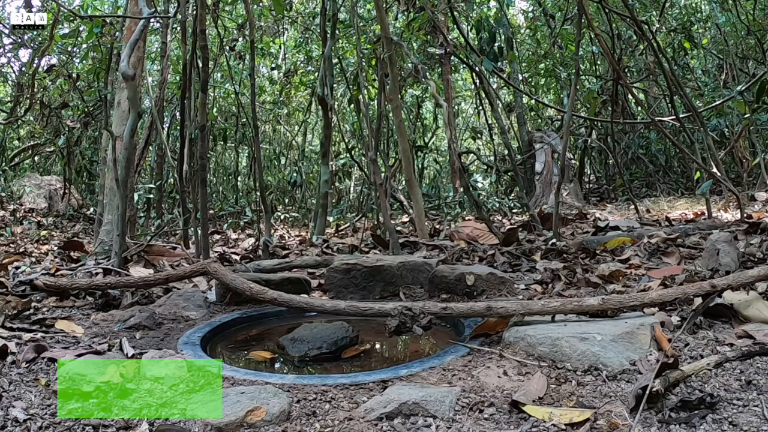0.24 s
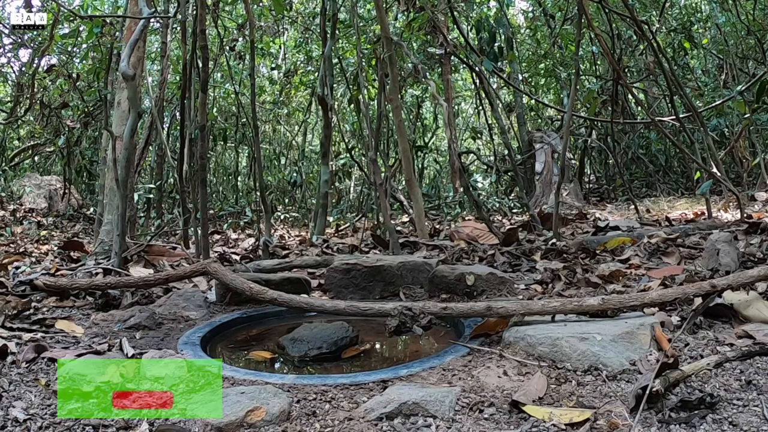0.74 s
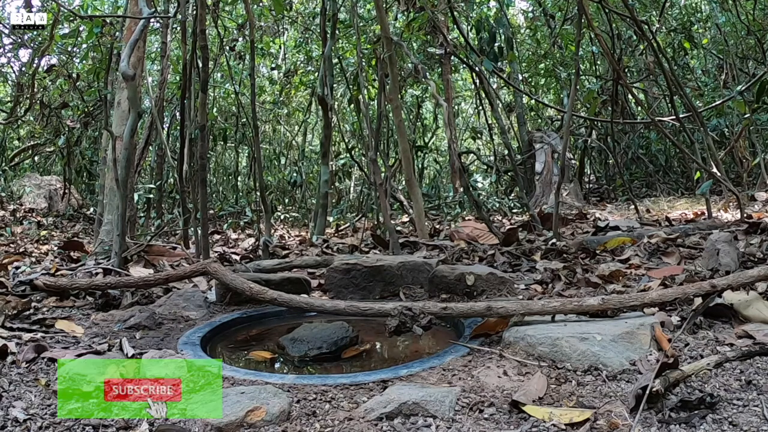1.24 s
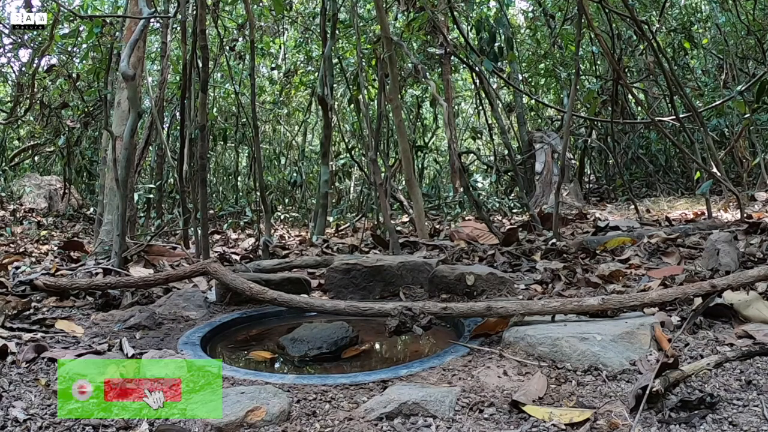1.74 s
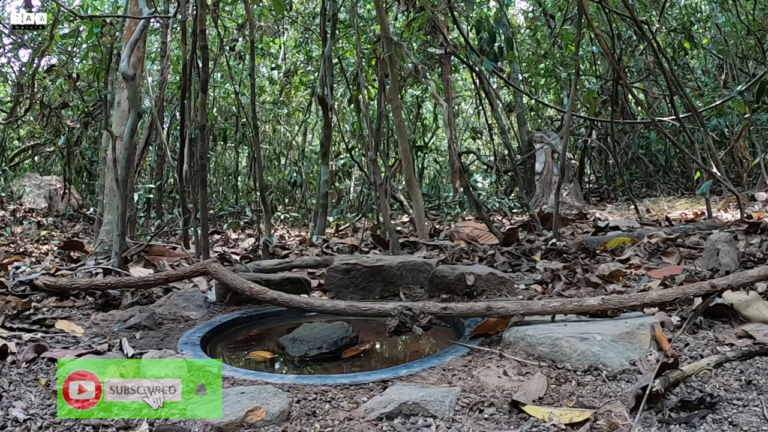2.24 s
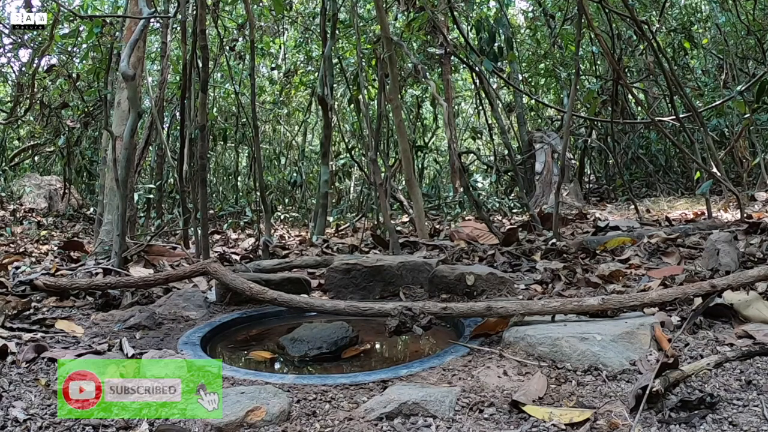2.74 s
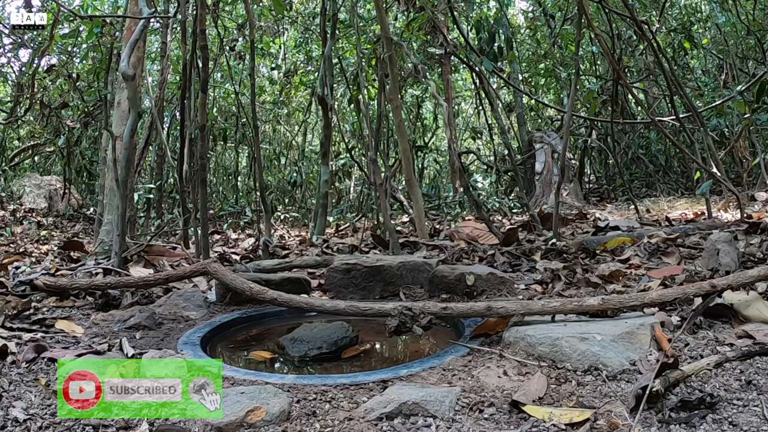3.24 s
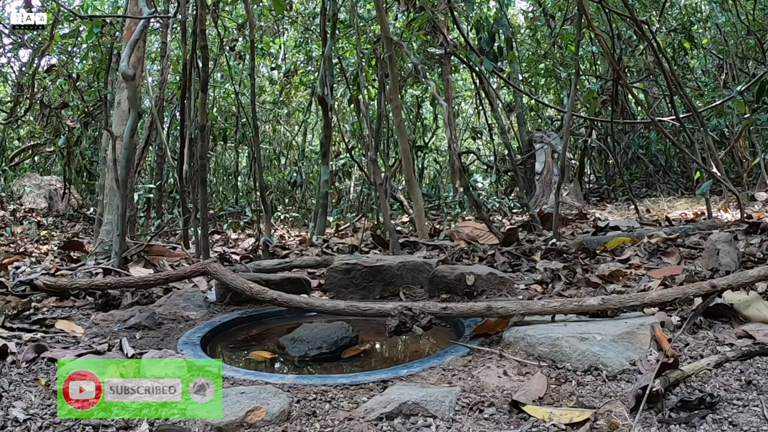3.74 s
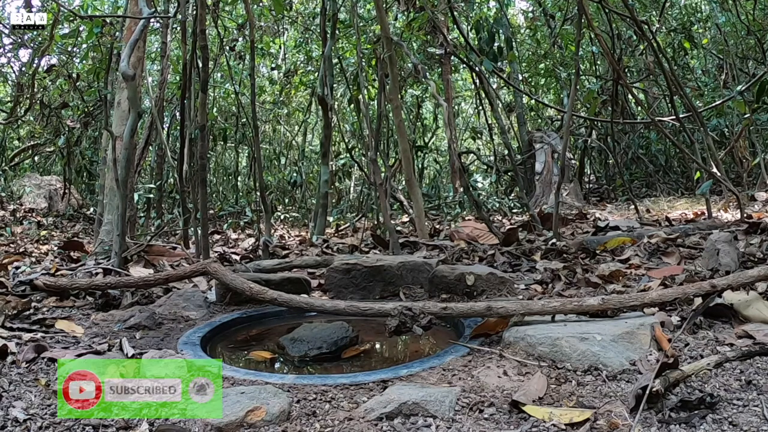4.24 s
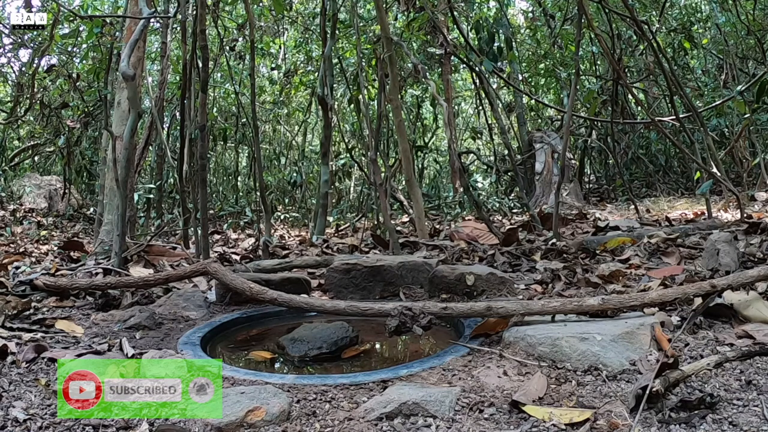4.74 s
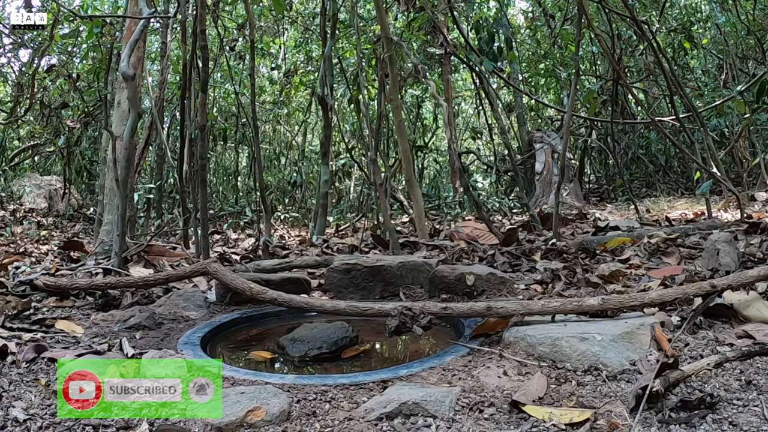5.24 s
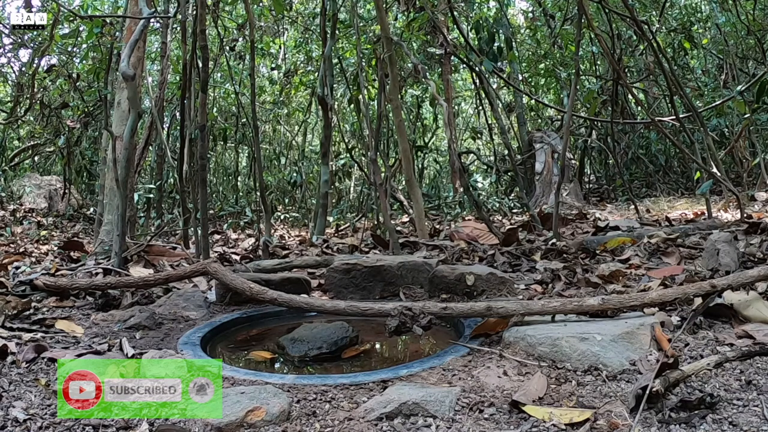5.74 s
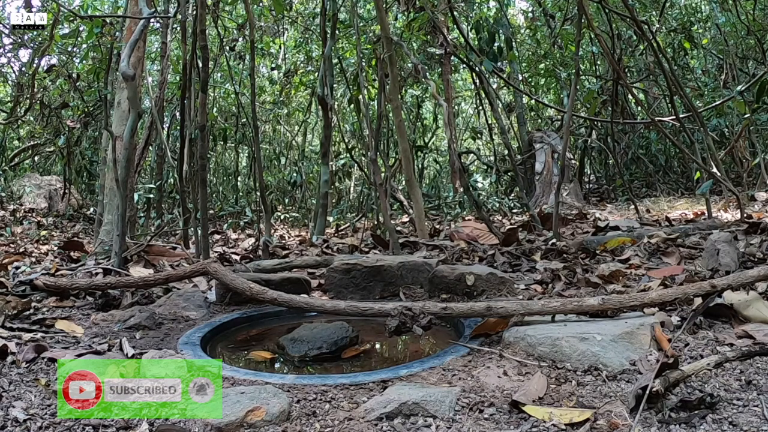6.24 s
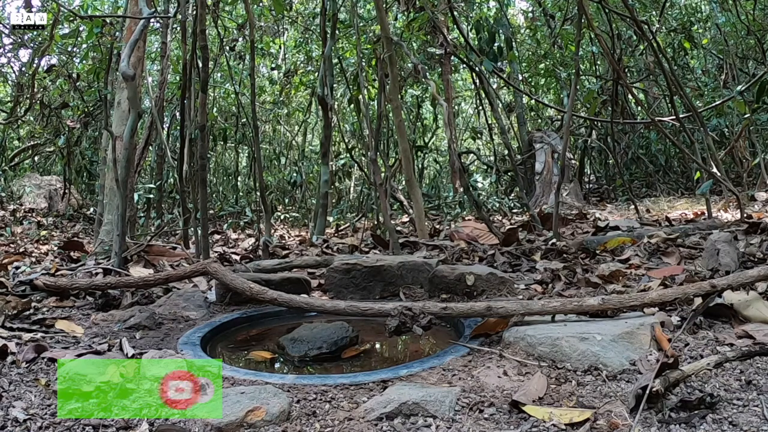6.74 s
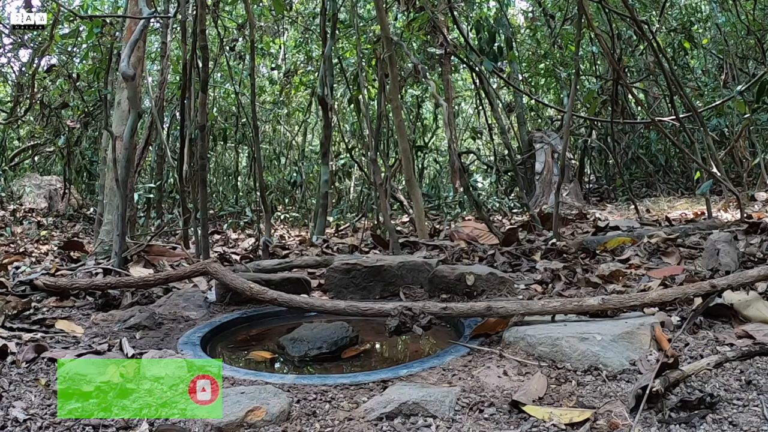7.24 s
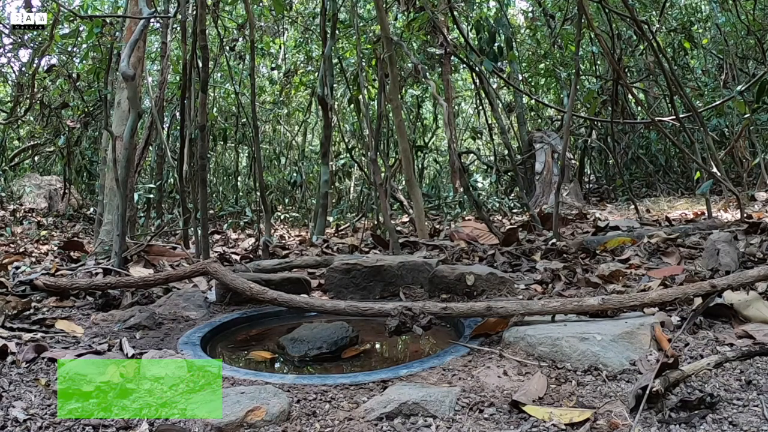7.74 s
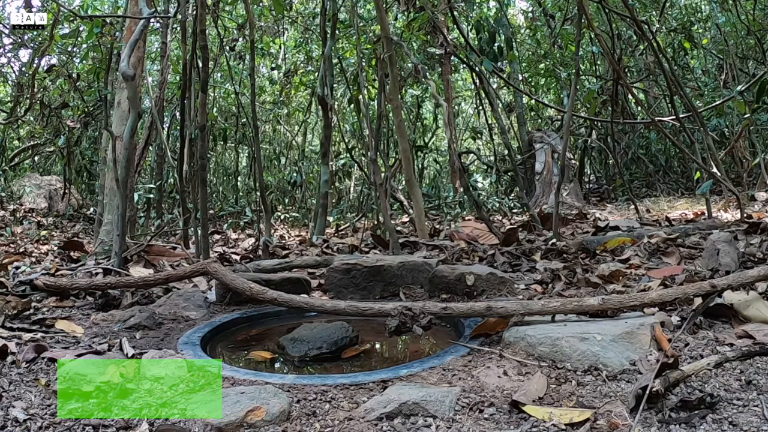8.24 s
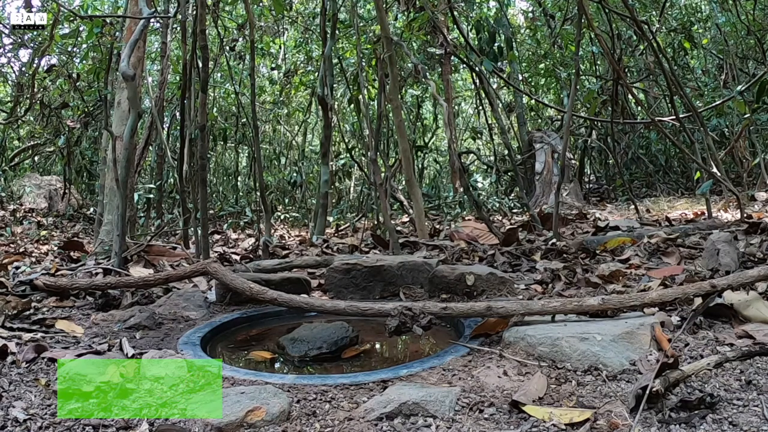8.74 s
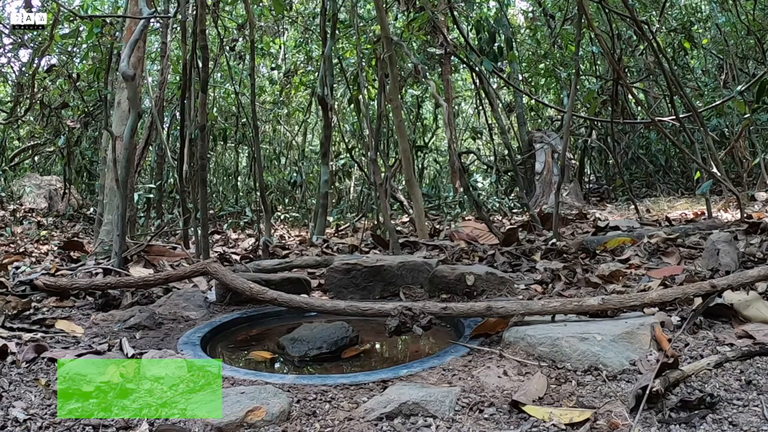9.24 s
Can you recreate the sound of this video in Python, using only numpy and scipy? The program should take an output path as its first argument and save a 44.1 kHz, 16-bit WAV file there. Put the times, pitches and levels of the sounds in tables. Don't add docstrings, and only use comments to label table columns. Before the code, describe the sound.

Stereo microphones at a small forest pool. A near bird on the left repeats a hoarse chatter snapping into a bright rising flick, loudest first and fading after a few calls. A farther hooter gives three separate low three-note phrases. Thin whistles and cries answer with woody echo; wings flutter past on the right, a squawk sounds near seven seconds, and a trill follows at eight. Leaves rustle, insects hiss softly.

```python
import sys
import numpy as np
from scipy import signal
from scipy.fft import rfft, irfft
from scipy.io import wavfile
from scipy.ndimage import uniform_filter1d

SR = 44100
rng = np.random.default_rng(int(sys.argv[2]) if len(sys.argv) > 2 else 0)


def boost_factor(decibels):
    exponent = np.asarray(decibels, float) / 20
    return 10 ** exponent


def pcm_store(signal):
    levels = np.round(np.clip(np.atleast_2d(signal), -1, 1) * 32767)
    wavfile.write(sys.argv[1], SR, levels.astype(np.int16).T)


N = 418950

# start_s, flick_start_s, chatter_pitch_hz, flick_top_hz, flick_level_db, chatter_level_db
FLICK_CALLS = [
    (1.018, 1.0825, 802, 5110, -20.5, -1),
    (1.232, 1.296, 771.5, 4695, -23.5, -1),
    (1.534, 1.592, 748, 4300, -24, -2.5),
    (1.726, 1.783, 751, 4200, -27.5, -4),
    (1.957, 2.013, 746, 4225, -26.5, -3),
    (2.552, 2.608, 764, 4000, -33.5, -3),
    (3.251, 3.299, 755, 4450, -38, -2),
]
CHATTER_DB, CHATTER_FOLLOWS = -34.5, 0.32
PERCH_PAN_DB, HOPS_DB_PER_S = 4, -2
FLICK_S, FLICK_RISE_S, FLUTTER_HZ, FLUTTER = .029, 0.00896, 114.5, 0.41
FLICK_FROM, LEAPS_PER_DB = 4.3, .24
BREAK_DB, OCTAVE_DB = -18, -44
BRIGHTENS = 1.27

# start_s, pitch_factor, level_db, swell_factor
HOOT_PHRASES = [
    (1.675, 1.002, -37, 0.82),
    (5.175, 1, -36.5, 1.12),
    (8.415, 1.002, -37, 0.83),
]
# delay_s, pitch_hz, level_db (at full swell)
HOOT_SHAPES = [
    [(-.05, 775, -24), (-.028, 890, -9), (-.011, 778, -8), (.012, 899, -4), (.06, 793, 1.7),
     (.098, 818, -5)],
    [(.19, 794, -12.5), (.235, 726, 0), (.27, 760, -3), (.296, 800, -12)],
    [(.352, 762, -13), (.395, 709.3, -3), (.445, 797, 0), (.486, 814, -9)],
]

# start_s, length_s, first_hz, last_hz, level_db, bend_name
CLEAR_WHISTLES = [(1.8, 0.047, 1500, 750, -52, "hook"), (1.67, 0.119, 1090, 1030, -43.5, "glide"),
                  (3.985, 0.027, 920, 920, -48.5, "arch"), (8.08, 0.033, 1200, 1100, -55.5, "glide"),
                  (8.22, 0.17, 1040, 990, -48.5, "arch"), (6.282, 0.0126, 2600, 5100, -37, "glide"),
                  (6.332, .025, 3000, 5600, -40, "glide"), (6.335, 0.028, 1650, 3100, -48.5, "dip"),
                  (6.357, 0.042, 3200, 2200, -33.5, "loop"), (6.39, 0.01, 8000, 4300, -39, "glide"),
                  (7.49, 0.094, 6900, 6300, -52.5, "glide"), (3.99, 0.051, 1920, 1920, -56.5, "arch")]
# start_s, length_s, first_hz, last_hz, level_db, bend_name
SOFT_WHISTLES = [(9.08, 0.049, 1950, 1250, -57, "glide"), (3, 0.17, 1600, 1710, -66, "arch"),
                 (.64, 0.11, 2080, 1880, -47, "dip"), (.76, 0.122, 1940, 2070, -50, "glide"),
                 (2.79, 0.24, 1930, 1830, -57.5, "glide"), (3.52, 0.086, 2540, 2420, -46.5, "glide"),
                 (6.67, 0.25, 2160, 1960, -58, "glide"), (.552, 0.036, 2750, 3280, -50, "hook"),
                 (.585, 0.07, 3150, 2480, -53, "hook"), (.655, .12, 2480, 2440, -60, "glide"),
                 (.05, 0.045, 1130, 1330, -55, "glide"), (.105, .03, 1350, 1020, -54, "hook"),
                 (.16, .03, 1350, 1020, -59, "hook"), (2.22, 0.25, 1950, 2000, -51, "dip"),
                 (2.35, 0.21, 2900, 2950, -59, "glide"), (8.78, .2, 1520, 1450, -63, "glide"),
                 (4.37, 0.081, 1400, 1270, -53, "glide")]
WHISTLE_BENDS = {"glide": (.52, .001), "hook": (.76, 0.0023), "arch": (.55, .075), "dip": (.48, -.09),
                 "loop": (.49, 1.2)}

# start_s, length_s, first_hz, last_hz, note_rate_per_s
TRILL_LINES = [
    (6.0, .255, 3700, 3050, 41),
    (8.024, .71, 2600, 2310, 59.6),
    (8.04, .3, 3080, 3050, 59.6),
    (8.024, .71, 3720, 2980, 59.6),
]
# first_level_db, last_level_db, left_minus_right_db, roughness (0-1)
TRILL_LEVELS = [
    (-39, -34.5, 8, .24),
    (-43.5, -43, -6, .3),
    (-57, -54, -3.5, .4),
    (-47, -44, -3, .3),
]
SINKS_BY, NOTE_DROP = .38, .055
SECOND_NOTE_DB = -3

# start_s, length_s, level_db, left_minus_right_db
SQUAWK_CALLS = [
    (4.932, 0.091, -46.5, -8),
    (6.996, 0.078, -29, -4),
    (7.217, 0.066, -50, -8),
]
# frequency_hz, level_db
BEAK_RESONANCE = [(500, -44), (800, -11.5), (1200, -15.5), (1900, -8.5), (2600, 2), (3100, -9.5),
                  (4000, -16), (4700, -37), (6500, -79)]
SQUAWK_FIRST_HZ, SQUAWK_LAST_HZ, BEAK_OPENS_PER_DB = 442, 302, .012

# start_s, length_s, first_hz, last_hz, level_db, bend_name
DISTANT_WHISTLES = [(0, 0.03, 3200, 2300, -46, "glide"), (.07, 0.071, 2710, 3330, -43, "hook"),
                    (3.1, 0.13, 3290, 3850, -50, "hook"), (3.65, 0.17, 2590, 2664, -61, "arch"),
                    (3.9, 0.069, 3180, 3480, -57, "arch"), (6.25, 0.033, 4840, 5600, -35.5, "glide"),
                    (6.45, 0.088, 3790, 2800, -50.5, "hook"), (9.02, 0.051, 2695, 3500, -47, "glide"),
                    (9.095, 0.12, 2703, 3300, -42.5, "hook"), (9.14, 0.083, 3600, 5600, -58, "glide"),
                    (.25, 0.096, 2870, 2300, -58.5, "glide"), (4.47, .12, 4300, 3600, -52, "glide"),
                    (9.47, 0.028, 2890, 3130, -45, "glide")]
# start_s, length_s, first_hz, last_hz, level_db, bend_name
DEEPER_VOICES = [(0.233, 0.048, 1825, 1765, -57.5, "glide"), (5.948, 0.073, 1850, 2840, -50.5, "hook"),
                 (9.12, 0.06, 1305, 2910, -53, "glide"), (1.15, 0.037, 1370, 1160, -54, "dip"),
                 (7.509, 0.089, 1500, 1794, -64, "arch"), (8.361, 0.079, 2100, 1400, -46, "hook"),
                 (8.5, 0.096, 1348, 1996, -49.5, "glide"), (8.72, 0.199, 300.2, 297.3, -65, "glide"),
                 (9.2, 0.34, 291, 289, -65.5, "glide"), (3.28, 0.11, 2576, 1610, -46, "glide"),
                 (6.25, 0.042, 1960, 3140, -49, "glide")]
# start_s, length_s, first_hz, last_hz, level_db, bend_name
HOARSE_CRIES = [(8.585, .05, 4700, 3000, -43.5, "hook"), (8.68, .06, 4600, 3200, -55, "glide"),
                (5.335, .07, 4500, 2750, -48, "hook"), (5.56, 0.037, 4700, 2600, -57, "glide"),
                (7.34, .1, 4800, 6700, -44, "hook"), (4.62, .06, 3700, 2500, -48.5, "glide"),
                (4.74, .06, 3700, 2600, -56, "glide"), (2.7, .08, 2980, 6000, -50.5, "glide"),
                (5.955, .08, 3900, 6500, -42, "glide"), (3.29, .07, 3000, 1700, -45, "glide"),
                (4.27, .08, 1500, 2600, -52, "glide")]
# start_s, pitch_factor, level_db
CALLER_REPEATS = [
    (4.275, 1.1, -52),
    (4.71, 0.95, -45.5),
    (5.099, 1.024, -45),
    (5.53, 0.98, -46.5),
    (6.04, 1.01, -49.5),
    (6.46, 1.01, -46.5),
]
# delay_s, length_s, first_hz, middle_hz, last_hz, level_db
CALLER_NOTES = [
    (-.005, .085, 1450, 2020, 1780, 0.5),
    (0.041, 0.047, 2510, 2697, 2480, -12.5),
    (0.109, .1, 1150, 1400, 1350, -8),
]

# start_s, peak_level_db, left_minus_right_db
SINGING_BEATS = [
    (0.8334, -30, -13.5),
    (0.867, -29, -15),
    (0.8993, -27.5, -14),
    (0.9389, -30.5, -13),
    (4.4518, -28.5, -14.5),
    (4.4864, -25, -14),
    (4.522, -25, -17),
    (4.564, -30, -12),
]
# start_s, peak_level_db, left_minus_right_db
SINGLE_FLAPS = [
    (3.69, -51, 2),
    (3.72, -35, -8),
    (3.8948, -38.5, -3),
    (6.2563, -30, -3),
    (6.985, -51, 1),
]
# start_s, peak_level_db, left_minus_right_db
AIR_PUSHES = [
    (2.864, -43.5, -4),
    (2.894, -36.5, 1),
    (2.939, -36, -4),
    (2.984, -40, -5),
]
# frequency_hz, density_db_per_hz
FEATHER_SPECTRUM = [(1470, -19.5), (2500, -24), (3470, -12), (3980, -8), (5010, 0.5), (7340, 2), (7920, -3),
                    (14100, -42), (15500, -35)]
# start_s, peak_level_db
PASSING_BEATS = [(1.722, -44), (1.779, -37), (1.833, -43), (1.8873, -39.5), (1.9422, -43), (1.9936, -39),
                 (2.047, -42), (2.1003, -37.5), (2.1577, -40.5), (2.211, -40), (2.2649, -43), (2.3178, -35)]
# frequency_hz, density_db_per_hz
SWISH_SPECTRUM = [(1000, -29), (2500, 2), (6000, -3.5), (9000, 0.5), (12000, -17.5), (15500, -31)]

# frequency_hz, decay_t60_s
TRUNK_DECAY = [(700, 0.85), (2000, 0.95), (4500, 0.6), (9000, 0.25)]

# start_s, hold_s, fade_s, treble_level_db, body_level_db
RUSTLE_BURSTS = [(.87, 0.093, 0.13, -62.5, -6.5), (1.097, 0.1, 0.091, -66, -8),
                 (1.31, 0.026, 0.12, -69, -2), (1.796, .55, 0.14, -63, -10), (3.037, 0.5, .16, -63.5, -7.5),
                 (3.726, 0.033, 0.035, -59, -24), (3.91, 0, 0.1, -62, -22), (4.123, 0.033, 0.3, -62, -13.5),
                 (4.5, 0.013, 0.12, -57, -13), (5.72, 0, 0.13, -61, -20), (6.11, 0.024, 0.14, -62, 1),
                 (6.267, 0.13, 0.046, -56, -15), (7.084, 0.08, .11, -57, -13.5), (7.36, 0, 0.18, -67.5, -3),
                 (7.746, 0.37, 0.057, -67.5, -23), (8.442, 0.052, 0.1, -77, -3),
                 (8.73, 0, 0.14, -76.5, 6.5), (8.89, 0, 0.08, -61.5, -31), (5.98, 0.12, 0.11, -67, -14)]
# frequency_hz, density_db_per_hz
LEAF_SPECTRUM = [(710, -33.5), (1200, -22.5), (1500, -5), (2680, 1.5), (3050, 3), (7480, -4.5),
                 (13800, -37.5), (15000, -40.5), (15500, -54)]
FADE_DB, FALL_SLOWER, SAG_DB_PER_S = -21.5, 1.14, -6

# pitch_hz, width_hz, throb_rate_per_s, throb_depth (0-1), level_db
INSECT_BANDS = [
    (6146, 560, 49, 0.2, -58),
    (7770, 450, 30.5, 0.4, -62),
]
# frequency_hz, density_db_per_hz
AIR_SPECTRUM = [(20, -13), (70, -10), (120, -29), (150, 5), (210, -2.5), (534, -15), (760, -6.5),
                (1100, -13.5), (2760, -15.5), (4200, -19), (6200, -15), (8800, -20.5), (9900, -53.5),
                (15500, -66)]
# frequency_hz, left_right_likeness (-1 to 1)
AIR_LIKENESS = [(40, 0.46), (90, .3), (140, -0.25), (400, -0.66), (1500, -0.61), (8000, 0.4)]
AIR_DB = -51.5


def evened(x):
    return x / np.sqrt(np.mean(x ** 2) + 1e-20)


def read(points, hz):
    f, value = np.transpose(points)
    return np.interp(np.log(hz + 1), np.log(f + 1), value)


def add(mix, s, sound, pan_db=0.):
    part = mix[:, round(s * SR):][:, :len(sound)]
    part += sound[:part.shape[1]] * boost_factor(np.array([[pan_db / 2], [-pan_db / 2]]))


def wobble(size, hz):
    window = int(SR / hz)
    return evened(uniform_filter1d(uniform_filter1d(rng.standard_normal(size), window), window))


def coloured(x, spectrum):
    hz = np.fft.rfftfreq(x.shape[-1], 1 / SR)
    return irfft(rfft(x) * boost_factor(read(spectrum, hz)), x.shape[-1])


def tone(hz, multiples_db, rough):
    unsteady_hz = hz * (1 + 0.1203 * rough * wobble(len(hz), 534))
    phase = 2 * np.pi * np.cumsum(unsteady_hz) / SR
    wave = sum(boost_factor(db) * np.sin(k * phase) for k, db in multiples_db.items())
    return evened(wave * (1 + rough * wobble(len(hz), 410)))


def whistle(length, first_hz, middle_hz, last_hz, db, multiples_db, rough, edge):
    u = np.arange(round(length * SR)) / (length * SR)
    parabola = np.polyfit([0, .5, 1], [first_hz, middle_hz, last_hz], deg=2)
    voice = tone(np.polyval(parabola, u), multiples_db, rough)
    return boost_factor(db) * voice * signal.windows.tukey(len(u), edge)


def noise_field(spectrum, patchy_db, likeness):
    frames, hz = N // 256 + 5, np.fft.rfftfreq(1024, 1 / SR)
    a, b, c, d, patches = rng.standard_normal((frames, 513, 5)).T
    patches = uniform_filter1d(uniform_filter1d(patches, size=14, axis=0), size=20, axis=1)
    level = boost_factor(read(spectrum, hz)[:, None] + patchy_db * evened(patches))
    same = read(likeness, hz)[:, None]
    left = a + 1j * b
    right = same * left + np.sqrt(1 - same ** 2) * (c + 1j * d)
    field = signal.istft(np.array([left, right]) * level, nperseg=1024, noverlap=768)[1]
    return evened(field[:, :N])


def flicker():
    out = np.zeros((2, N))
    moods = rng.uniform(-0.95, 1, (len(FLICK_CALLS), 4))
    for (s, flick_s, hz, top_hz, flick_db, soft_db), mood in zip(FLICK_CALLS, moods):
        chatter_db = CHATTER_DB + soft_db + CHATTER_FOLLOWS * (flick_db + 26.0)
        pan_db = PERCH_PAN_DB + HOPS_DB_PER_S * (s - 1)

        lines = {2: -9, 3: -4 + 4 * mood[0], 4: .1, 5: -18}
        chatter = whistle(0.0217, .92 * hz, 1.04 * hz, 0.944 * hz, chatter_db, lines, rough=0.22, edge=0.28)
        hoarse = whistle(0.0237, .95 * hz, 1.1 * hz, 1.25 * hz, chatter_db + 0.5, lines, rough=0.75, edge=0.4)
        add(out, s - .002, chatter, pan_db)
        add(out, s + 0.021, hoarse, pan_db)

        lines = {2: -9, 3: -1.5, 4: BRIGHTENS * (flick_db + 25)}
        stack = whistle(.021, 1.19 * hz, 1.12 * hz, 1.053 * hz, flick_db - 3.5, lines, rough=0.18, edge=0.7)
        add(out, flick_s - .021, np.linspace(.7, 1.2, len(stack)) * stack, pan_db)

        t = np.arange(0, FLICK_S, 1 / SR)
        from_hz = (FLICK_FROM + LEAPS_PER_DB * max(flick_db + 24, -2)) * hz
        glide = top_hz - (top_hz - from_hz) * np.exp(-t / FLICK_RISE_S)
        flick = boost_factor(flick_db) * tone(glide, {1: 0, 2: OCTAVE_DB}, rough=.09)
        flick = flick * signal.windows.tukey(len(t), .15) * np.linspace(1.3, .65, len(t))
        depth = FLUTTER * np.clip((-16.5 - flick_db) / 6, 0, 1.5)
        flutter_phase = 2 * np.pi * (FLUTTER_HZ * (1 + 0.14 * mood[2]) * t + mood[3])
        add(out, flick_s, flick * (1 + depth * np.sin(flutter_phase)), pan_db)

        click = whistle(0.0072, 3 * hz, 5.5 * hz, 8 * hz, flick_db + BREAK_DB, {1: 0}, rough=.8, edge=0.8)
        add(out, flick_s - .005, click, pan_db)
    return out


def hooter():
    out = np.zeros((2, N))
    for start, factor, level_db, swell in HOOT_PHRASES:
        for rows in HOOT_SHAPES:
            s, hz, db = np.transpose(rows)
            t = np.arange(s[0], s[-1], 1 / SR)
            pitch = factor * uniform_filter1d(np.interp(t, s, hz), size=500, mode="nearest")
            voice = tone(pitch, {1: 0, 2: -32}, rough=0.019)
            note = boost_factor(level_db + swell * np.interp(t, s, db)) * voice
            add(out, start + s[0], note * signal.windows.tukey(len(t), .15), -.3)
    return out


def squawker():
    out = np.zeros((2, N))
    for s, length, db, pan_db in SQUAWK_CALLS:
        u = np.arange(round(length * SR)) / (length * SR)
        sinking = np.cos(np.pi / 2 * np.minimum(u / .75, 1)) ** 2
        hz = SQUAWK_LAST_HZ + (SQUAWK_FIRST_HZ - SQUAWK_LAST_HZ) * sinking
        gape = 1 + BEAK_OPENS_PER_DB * (db + 28.5)
        harmonics = {k: .5 * read(BEAK_RESONANCE, k * 0.9 * SQUAWK_FIRST_HZ / gape) for k in range(2, 15)}
        beak = [(f * gape, .5 * beak_db) for f, beak_db in BEAK_RESONANCE]
        voice = evened(coloured(tone(hz, harmonics, rough=0.17), beak))
        add(out, s, boost_factor(db) * voice * np.minimum(u / 0.16, 1) * np.cos(np.pi / 2 * u) ** 0.77, pan_db)
    return out


def wings():
    out, t = np.zeros((2, N)), np.arange(-.03, .06, 1 / SR)
    beat = np.exp(-abs(t) / np.where(t < 0, .002, .0035))
    for s, db, pan_db in SINGING_BEATS + SINGLE_FLAPS:
        feathers = evened(coloured(rng.standard_normal(len(t)), FEATHER_SPECTRUM))
        add(out, s - .028, boost_factor(db - 4.5) * feathers * beat, pan_db)
    for s, db in PASSING_BEATS:
        swish = evened(coloured(rng.standard_normal(len(t)), SWISH_SPECTRUM))
        add(out, s - .03, boost_factor(db - 2) * swish * beat)
    for s, db, pan_db in SINGING_BEATS:
        sung = tone(930 + 1050 * np.exp(-((t - .002) / 0.00545) ** 2), {1: 0}, rough=0.35)
        add(out, s - .028, boost_factor(db - 16.5) * sung * np.exp(-((t + 0.0038) / 0.0066) ** 2), 0.85 * pan_db)
    for s, db, pan_db in AIR_PUSHES:
        push = np.sin(2 * np.pi * 185 * t) * np.exp(-(t / 0.0036) ** 2)
        add(out, s - .024, boost_factor(db + 0.5) * push, pan_db)
    return out


def trillers():
    out = np.zeros((2, N))
    for (s, length, first_hz, last_hz, rate), levels in zip(TRILL_LINES, TRILL_LEVELS):
        first_db, last_db, pan_db, rough = levels
        t = np.arange(0, length, 1 / SR)
        u = (t * rate) % 1
        sunk = 1 - np.exp(-(t / length / SINKS_BY) ** 1.4)
        hz = (first_hz + (last_hz - first_hz) * sunk) * (1 + NOTE_DROP * (.5 - u))
        effort = boost_factor(first_db + (last_db - first_db) * t / length + SECOND_NOTE_DB * (t * rate // 1 % 2))
        pulse = .1 + .9 * np.sin(np.pi * u ** .6) ** 1.6
        add(out, s, effort * tone(hz, {1: 0}, rough=rough) * pulse, pan_db)
    return out


def whistlers(notes, rough, spread_db, octave_db):
    out = np.zeros((2, N))
    for (s, *note), side in zip(notes, rng.uniform(-0.066, 1, len(notes))):
        sound = whistle(*note, {1: 0, 2: octave_db}, rough=rough, edge=0.15)
        add(out, s, sound, spread_db * side)
    return out


def bent(notes):
    result = []
    for s, length, first_hz, last_hz, db, bend in notes:
        done, bow = WHISTLE_BENDS[bend]
        middle_hz = first_hz + done * (last_hz - first_hz) + bow * (first_hz + last_hz) / 2
        result.append((s, length, first_hz, middle_hz, last_hz, db))
    return result


def two_note_caller():
    notes = []
    for s, factor, db in CALLER_REPEATS:
        for delay, length, first_hz, middle_hz, last_hz, note_db in CALLER_NOTES:
            pitches = factor * first_hz, factor * middle_hz, factor * last_hz
            notes.append((s + delay, length, *pitches, db + note_db))
    return notes


def trunks(x, echo_s=.078, echo_db=-20):
    taps = np.zeros((2, SR))
    slots = np.arange(200, SR - 40, 40)
    at = slots + rng.integers(0, 40, (2, len(slots)))
    np.put_along_axis(taps, at, rng.choice([-1., 1.], at.shape), axis=1)
    taps = taps + 0.33 * taps[::-1]
    hz, t, z = signal.stft(taps, SR, nperseg=256)
    decay = boost_factor(-60 * t / read(TRUNK_DECAY, hz)[:, None])
    tail = signal.istft(z * decay, SR, nperseg=256)[1]
    i = np.arange(tail.shape[1])
    tail = tail * (1 + 0.78 * np.exp(-i / (0.038 * SR)))
    tail = tail / np.linalg.norm(tail[0]) + boost_factor(echo_db) * (i == round(echo_s * SR))
    return signal.fftconvolve(x, tail, axes=1)[:, :N]


def leaves():
    t, treble, low = np.arange(N // 64 + 2) * 64 / SR, 0, 0
    for s, hold, fade, db, body_db in RUSTLE_BURSTS:
        away = np.maximum(s - t, 0) + np.maximum(t - s - hold, 0) / FALL_SLOWER
        burst = boost_factor(db + FADE_DB * away / fade + SAG_DB_PER_S * np.clip(t - s, 0, hold))
        treble = treble + burst
        low = low + boost_factor(body_db) * burst
    treble, low = (np.interp(np.arange(N) / SR, t, gain) for gain in (treble, low))
    hiss = noise_field(LEAF_SPECTRUM, 2.8, [(2000, 0.68), (10000, 0.027)])
    body = signal.sosfiltfilt(signal.butter(2, 7000, fs=SR, output="sos"), hiss)
    flicker_gain = boost_factor(24.0 + 2.28 * wobble(N, 25.6) + 1.38 * wobble(N, 150))
    return flicker_gain * (treble * (hiss - body) + low * body)


def insects():
    out, t = np.zeros((2, N)), np.arange(N) / SR
    for hz, width, rate, depth, db in INSECT_BANDS:
        band = [(hz - 2 * width, -40), (hz - width / 2, 0), (hz + width / 2, 0), (hz + 2 * width, -40)]
        cycle = (t * rate + 1.3 * wobble(N, 6)) % 1
        throb = 1 - depth + depth * 4 * np.exp(-cycle / 0.22)
        hiss = evened(coloured(rng.standard_normal((2, N)), band))
        out += boost_factor(db + 3.14 * wobble(N, 3.4)) * throb * hiss
    return out


def forest_air():
    return boost_factor(AIR_DB + 1.5) * noise_field(AIR_SPECTRUM, 2.2, AIR_LIKENESS)


def scene():
    near, low, squawks, wing = flicker(), hooter(), squawker(), wings()
    middle = whistlers(bent(CLEAR_WHISTLES + SOFT_WHISTLES), rough=0.15, spread_db=1.0, octave_db=-39)
    middle = middle + trillers()
    far_notes = bent(DISTANT_WHISTLES + DEEPER_VOICES) + two_note_caller()
    far = whistlers(far_notes, rough=.5, spread_db=4, octave_db=-40)
    hoarse = whistlers(bent(HOARSE_CRIES), rough=1.1, spread_db=4, octave_db=-30)

    sent = boost_factor(-3.0) * near + boost_factor(-9.5) * low + boost_factor(-16) * squawks + boost_factor(-9.0) * wing
    sent = sent + boost_factor(-4.5) * middle + far + hoarse
    direct = near + low + squawks + wing + middle + boost_factor(-6.5) * far + boost_factor(-13) * hoarse
    return direct + trunks(sent) + leaves() + insects() + forest_air()


def roll_off(x):
    return signal.sosfilt(signal.butter(12, 15680, fs=SR, output="sos"), x)


def record(dry):
    return roll_off(dry)


dry = scene()
out = record(dry)
pcm_store(out)
```